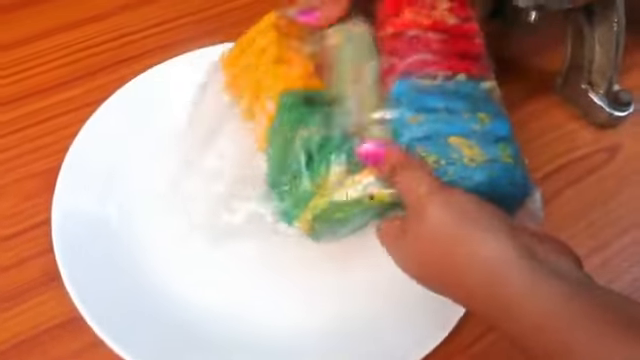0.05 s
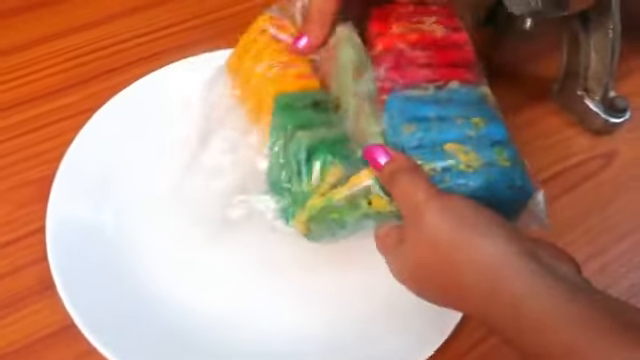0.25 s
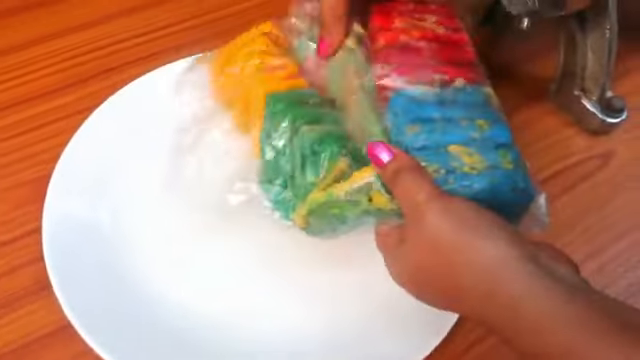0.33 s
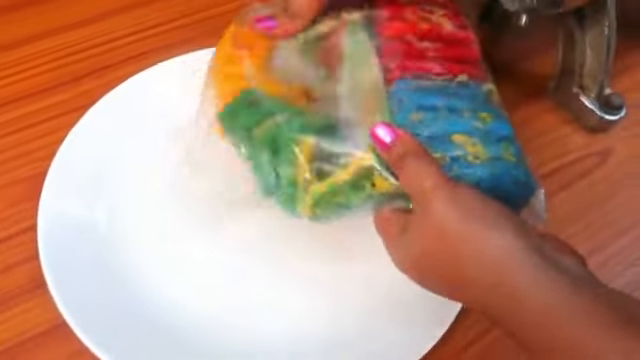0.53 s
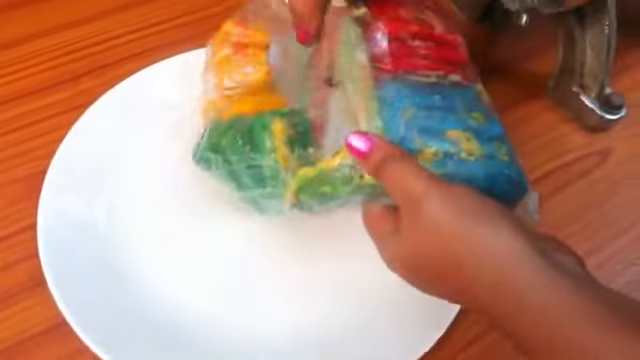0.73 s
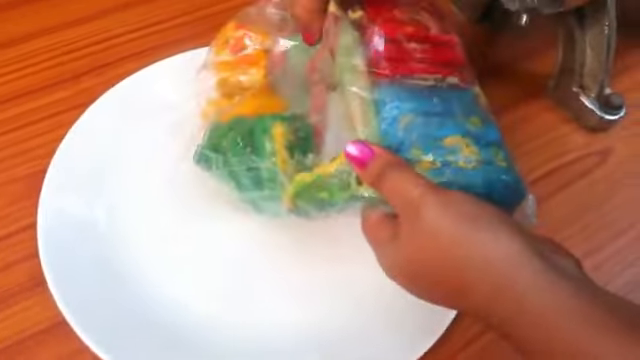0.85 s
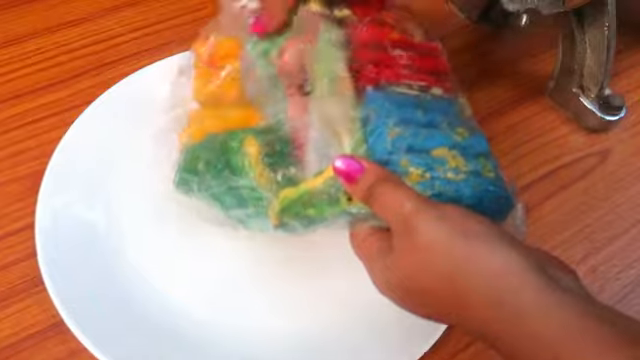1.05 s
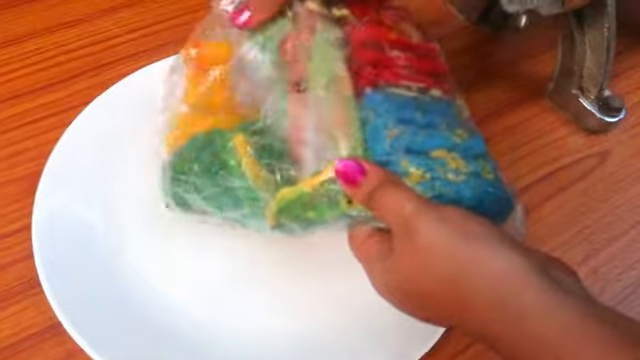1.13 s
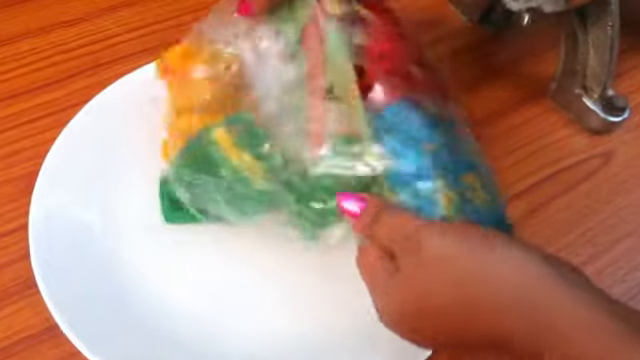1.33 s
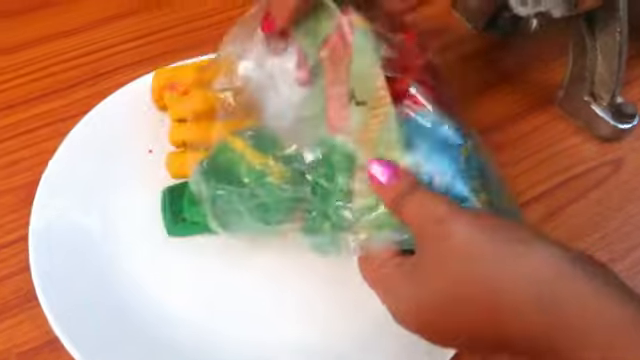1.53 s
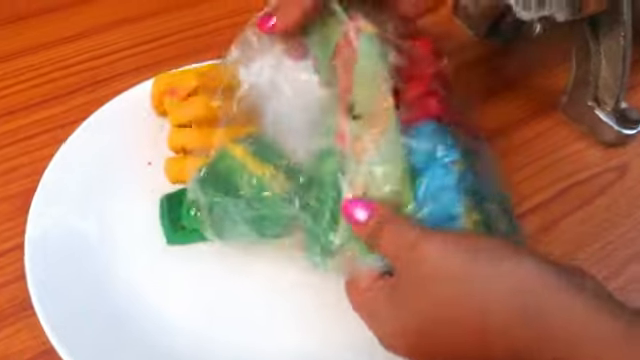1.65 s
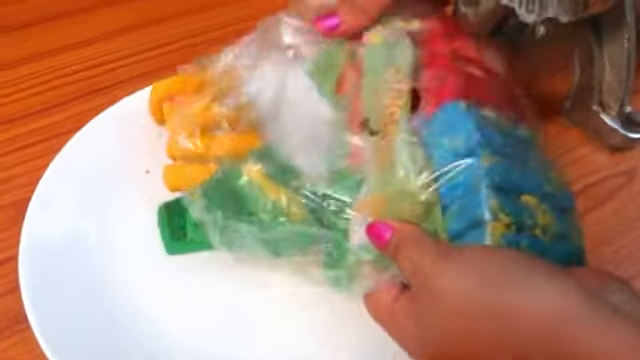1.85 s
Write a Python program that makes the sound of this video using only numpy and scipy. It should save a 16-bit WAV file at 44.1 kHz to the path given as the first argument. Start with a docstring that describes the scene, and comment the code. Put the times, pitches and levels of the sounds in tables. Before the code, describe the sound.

A thin plastic bag crinkles close by throughout, with small sharp snaps, strongest around 0.7 seconds. At 0.8 seconds modelling clay lands on a plate with a hard clack, a very brief ring and a wooden table thump. The bag goes quieter, then rustles up again from 1.4 seconds. More clay falls in a quick cluster of knocks and a thump near 1.6 seconds, in a small quiet room.

```python
"""A thin plastic bag is worked open close by: all along, its film crinkles in tiny buckles and sharper snaps.
Sticks of modelling clay slide out with a faint rumble and a few light taps. At 0.8 s clay lands hard on
a plate, which rings briefly, and the wooden table under it thumps. The bag goes quieter, then rustles up
again, and more clay knocks down near 1.55 s. A small room answers faintly throughout."""
import sys
import numpy as np
from scipy import signal
from scipy.fft import rfft, irfft, next_fast_len
from scipy.io import wavfile
from scipy.ndimage import uniform_filter1d

SR = 44100
rng = np.random.default_rng(int(sys.argv[2]) if len(sys.argv) > 2 else 0)


def waveform_to_disk(signal):
    """Save audio, clipped to [-1, 1], as 16-bit WAV at the path in sys.argv[1]."""
    frames = np.transpose(np.atleast_2d(signal))
    scaled = np.clip(frames, -1, 1) * 32767
    samples = np.round(scaled).astype(np.int16)
    wavfile.write(sys.argv[1], SR, samples)


N = 83790

# how loudly the bag crinkles as the hands work: t/s, then level/dB of the low, mid, upper and high range
CRINKLE_LEVELS = [(0, -41, -37, -42, -46.5), (0.071, -47, -36, -44, -51.5),
                  (0.127, -52.5, -48, -56.5, -57.5), (0.2, -37, -32.5, -42, -47),
                  (0.284, -37, -33.5, -40.5, -53), (0.335, -50, -42, -63, -70),
                  (0.36, -53.5, -44, -60, -65), (0.408, -36, -36.5, -48.5, -54.5),
                  (0.501, -36.5, -31.5, -37.5, -43), (0.56, -41, -36.5, -46.5, -53.5),
                  (0.61, -38.5, -37, -45, -47.5), (0.66, -29.5, -25.5, -33, -41.5),
                  (0.71, -33.5, -31, -44, -48), (0.759, -46.5, -36.5, -47.5, -51),
                  (0.849, -39, -37, -56.5, -56.5), (0.92, -48.5, -45, -58.5, -68),
                  (0.98, -49.5, -50.5, -49.5, -61), (1.05, -60.5, -48, -66, -71),
                  (1.1, -67.5, -56.5, -55.5, -66), (1.16, -54.5, -46, -58, -54.5),
                  (1.21, -57, -52, -67, -70), (1.26, -45.5, -45, -43.5, -58), (1.32, -57.5, -44, -58, -67),
                  (1.37, -54.5, -51.5, -54, -61), (1.42, -45.5, -39.5, -47, -49),
                  (1.48, -45, -36, -43.5, -46.5), (1.56, -39.5, -37.5, -42.5, -54),
                  (1.62, -41, -44, -57, -66), (1.68, -47.5, -44, -61, -73),
                  (1.76, -52.5, -49, -63.5, -67.5), (1.831, -55.5, -51, -61, -66.5),
                  (1.862, -49.5, -43, -54, -48.5), (1.9, -42.5, -38, -45.5, -56)]
# tone of the short crackle in every knock and snap: f/Hz, level/dB
CRACKLE_TONE = [(60, -31), (250, -22.5), (600, 0), (1500, 8), (3500, -15.5), (5000, -3.5), (6500, -55),
                (8300, -29), (11000, -21), (16000, -27)]


def amp(db):
    """Turn decibels into a gain."""
    return 10 ** (np.asarray(db) / 20)


def unit(x):
    """Scale a sound to an average (rms) size of 1."""
    return x / np.sqrt(np.mean(x ** 2) + 1e-20)


def along(points, hz):
    """Read a curve of (f/Hz, value) points at hz, on a log frequency axis."""
    f, values = np.transpose(points)
    return np.interp(np.log(hz + 1), np.log(f + 1), values)


def coloured(x, tone):
    """Filter x to a tone curve (f/Hz, level/dB)."""
    size = 2 * next_fast_len(len(x) // 2 + 2048, real=True)
    gain = amp(along(tone, np.fft.rfftfreq(size, 1 / SR)))
    cepstrum = irfft(np.log(gain), size)
    cepstrum[1:size // 2] *= 2  # folded so that the filter rings only after a click, never before
    cepstrum[size // 2 + 1:] = 0
    return irfft(rfft(x, size) * np.exp(rfft(cepstrum)), size)[:len(x)]


def noise(tone, size):
    """Noise with this tone curve and an rms of 1."""
    return unit(coloured(rng.standard_normal(size), tone))


def fade(t, t60):
    """Die away by 60 dB every t60 seconds."""
    return np.exp(-np.log(1000) * t / t60)


def ping(t, hz, t60):
    """A short pitched click that swells over its first half cycle."""
    swell = 1 - np.exp(-(2 * hz * t) ** 2)
    motion = np.sin(2 * np.pi * hz * t) * fade(t, t60) * swell
    return np.gradient(motion, axis=-1) * SR / (2 * np.pi * hz)  # its slope: no net push of air


def add(track, s, sound):
    """Mix a sound in at s seconds."""
    i = max(round(s * SR), 0)
    track[i:i + len(sound)] += sound[:max(N - i, 0)]


def buckles(spread_db):
    """Start samples and sizes of an uneven run of tiny buckles; gentle handling sets off fewer."""
    tries_per_s, sparse_below_db = 400, -35
    gap_draw, size_draw, flip_draw = rng.random(size=(1500, 3)).T
    s = np.cumsum(0.2 + 1.6 * gap_draw) / tries_per_s
    times, _, mid_db, _, _ = np.transpose(CRINKLE_LEVELS)
    flips = flip_draw < amp(np.interp(s, times, mid_db) - sparse_below_db) ** 0.2
    size = amp(spread_db * np.minimum(-np.log(size_draw), 2.5))
    return (s * SR).astype(int), flips * size


def film(shared, tone, pitch_hz, pitch_spread, own_db, spread_db, t60, slide_share):
    """One range of the plastic: each buckle gives a ping and a burst of hiss, over steady sliding."""
    ring_cycles, rise_s, pings_db = 18.3, 0.00022, -1
    shared_start, shared_size = shared
    own_start, own_size = buckles(spread_db)
    start, size = np.r_[shared_start, own_start], np.r_[shared_size, amp(own_db) * own_size]
    t = np.arange(SR // 60) / SR
    hz = pitch_hz * np.exp(pitch_spread * rng.uniform(-1.075, 1, (len(start), 1)))
    each_ping = size[:, None] * ping(t, hz, ring_cycles / hz)
    positions = start[:, None] + np.arange(len(t))
    pings = np.bincount(positions.ravel(), each_ping.ravel(), N)[:N]
    burst = fade(t, t60) * (1 - np.exp(-t / rise_s))
    energy = np.convolve(np.bincount(start, size ** 2, N)[:N], burst ** 2)[:N]
    hiss = np.sqrt(energy / energy.mean() + slide_share) * rng.standard_normal(N)
    sound = unit(coloured(hiss, tone)) + amp(pings_db) * unit(coloured(pings, tone))
    power = np.abs(uniform_filter1d(sound ** 2, size=1500))
    return sound / np.sqrt(power + 1e-9)  # evens out the loudness


def crinkle():
    """The bag's folds, from broad to tiny, buckle largely together, each range at its own level."""
    # tone of each range of the film: f/Hz, level/dB
    low_tone = [(30, -28), (70, -19), (150, -29.5), (300, -8.5), (600, -2), (900, -5.5), (1200, 2),
                (1600, 0), (2000, 2.5), (3000, -21.5), (8000, -55)]
    mid_tone = [(800, -55), (1650, -37), (2280, 0.5), (2800, -4), (3300, 1.5), (4000, -4.5), (4600, -11.5),
                (6000, -39), (11000, -92)]
    upper_tone = [(2000, -48), (3800, 2), (4700, -1), (5700, 2), (6500, -8.5), (7300, -9.5), (8300, -35),
                  (11000, -76)]
    high_tone = [(3000, -54), (6000, -39), (7200, -12.5), (8300, -14.5), (9300, -5.5), (10500, 1),
                 (13500, 2), (15000, -3), (16000, -58)]
    times, *levels = np.transpose(CRINKLE_LEVELS)
    low, mid, upper, high = [amp(np.interp(np.arange(N) / SR, times, db)) for db in levels]
    shared = buckles(spread_db=5)
    low *= film(shared, low_tone, pitch_hz=1154, pitch_spread=0.529,
                own_db=10, spread_db=3, t60=0.011, slide_share=0.17)
    mid *= film(shared, mid_tone, pitch_hz=2960, pitch_spread=0.5,
                own_db=-9, spread_db=6.5, t60=0.012, slide_share=0.15)
    upper *= film(shared, upper_tone, pitch_hz=5360, pitch_spread=0.27,
                  own_db=-9.5, spread_db=7.5, t60=0.008, slide_share=0.11)
    high *= film(shared, high_tone, pitch_hz=11100, pitch_spread=0.45,
                 own_db=-6.5, spread_db=7, t60=0.006, slide_share=0.052)
    return amp(-0.5) * low + amp(-1.5) * mid + amp(-1) * upper + amp(-1.5) * high


def clay_slide():
    """The sliding sticks rub a faint rumble out of plate and table."""
    # loudness of the rumble: t/s, level/dB
    rumble_levels = [(0, -63), (.4, -68), (.55, -60), (.67, -45.5), (.77, -55), (.88, -56), (.95, -75),
                     (1.2, -71), (1.33, -62.5), (1.5, -58.5), (1.64, -47), (1.72, -63.5), (1.9, -62.5)]
    # its tone: f/Hz, level/dB
    rumble_tone = [(30, -14), (70, -20), (120, -4.5), (165, -4), (210, -3.5), (300, 2), (400, -5.5),
                   (700, -20), (2000, -86.5)]
    times, db = np.transpose(rumble_levels)
    return amp(np.interp(np.arange(N) / SR, times, db)) * noise(rumble_tone, N)


def room_air():
    """The steady, very soft hush of the room."""
    # tone of the hush: f/Hz, level/dB
    hush_tone = [(25, -13.5), (55, 0), (150, -7), (500, 8), (2000, -7), (8000, -86), (16000, -43)]
    return amp(-65) * noise(hush_tone, N)


def room_echo(x):
    """The small room adds a short tail in which the middle pitches die first."""
    # how long the room rings: f/Hz, t60/s
    ring_times = [(200, 0.2), (1500, 0.053), (5000, 0.053), (14000, 0.19)]
    hz, t, spectra = signal.stft(rng.standard_normal(SR // 3), SR, nperseg=256)
    tail = signal.istft(spectra * fade(t, along(ring_times, hz)[:, None]), SR, nperseg=256)[1]
    delayed = np.pad(tail, (SR // 250, 0)) / np.linalg.norm(tail)
    return signal.fftconvolve(x, delayed)[:N]


def clay_knocks():
    """Clay hits the plate with a dull clack; the plate's notes near that pitch ring on the loudest."""
    # taps and landings: t/s, level/dB, clack f/Hz, clack t60/s, plate ring/dB, dull above f/Hz
    hits = [(0.037, -29.5, 1210, .02, -16, 1600), (.079, -27.5, 775, 0.017, -16, 1390),
            (.747, -27.5, 595, 0.02, -19, 900), (.782, -21, 1240, 0.002, -7, 2360),
            (.7994, 5, 1334, 0.0044, -20.5, 4140), (0.803, -2, 1520, 0.008, -31, 3350),
            (.827, -19, 2800, 0.0051, -26, 3400), (.8375, -16, 1750, 0.0058, -14, 3420),
            (1.3836, -18, 1970, .004, -13, 3000), (1.538, -5.5, 1090, .014, -27, 2000),
            (1.5419, -5.5, 1950, 0.006, -14, 2180), (1.558, -19, 1110, 0.02, -25, 1400),
            (1.572, -27, 1130, .015, -22, 3200), (1.5879, -7.5, 3067, 0.021, -20, 3550),
            (1.5886, -14, 1140, .014, -10.5, 2400), (1.5911, -2, 2410, 0.0041, -23, 3700),
            (1.609, -26, 3000, 0.011, -4, 3450)]
    # the plate's own notes: f/Hz, level/dB, t60/s
    plate_notes = [(586, 1.5, 0.049), (733, -7.5, .13), (865, -15, 0.057), (1201, 8, 0.024),
                   (1541, 2.5, 0.047), (1822, -12, 0.076), (2026, 2, 0.02), (2260, 2, 0.035),
                   (2500, -7, 0.11), (3140, -4, 0.036), (3310, -2, 0.04)]
    # tone of the bright, clipping-like click on the loudest hits: f/Hz, level/dB
    click_tone = [(1000, -10), (3000, 3), (4500, 2), (6700, -19), (9000, -27), (15000, -36)]
    out, t = np.zeros(N), np.arange(SR // 4) / SR
    for s, db, hz, t60, ring_db, dull_hz in hits:
        ring = sum(amp(level + rng.normal(0, 0.98)) / (1 + 1.7 * np.log2(f / hz) ** 2) * ping(t, f, life)
                   for f, level, life in plate_notes)
        crackle = amp(-15.5) * noise(CRACKLE_TONE, len(t)) * fade(t, t60=0.018)
        click = amp(db - 18.5) * noise(click_tone, len(t)) * fade(t, t60=0.0047)
        softness = [(dull_hz, 0), (2 * dull_hz, -37.5)]  # soft clay muffles the treble
        clack = coloured(ping(t, hz, t60) + crackle + amp(ring_db) * ring, softness)
        # db counts twice in the click, so the loudest hits crack as if overloaded
        add(out, s, amp(db) * (clack + click))
    return out


def bag_snaps():
    """A fold flips: a few cycles of its own pitch, a bright tick and a shiver of the film around it."""
    # single folds snapping over: t/s, level/dB, f/Hz, treble/dB
    folds = [(0.0372, -25, 2700, 0), (0.0634, -16.5, 3360, -5), (0.08, -22.5, 2510, -20),
             (0.103, -19, 3040, -7.5), (0.1186, -23, 3350, -24), (0.1361, -23, 3370, -9),
             (0.1583, -19, 3030, -4), (0.1993, -9.5, 1590, -18), (0.2167, -16, 2000, -7.5),
             (0.2258, -15.5, 1240, -16), (0.2639, -15, 2100, -15), (0.3477, -20, 2320, -20),
             (0.3751, -11, 3200, -37), (0.3913, -17, 2130, -11), (0.4035, -9.5, 2470, -26),
             (0.414, -11, 3260, -20), (0.475, -13, 2640, -11.5), (0.5011, -7.5, 3380, -21),
             (0.5284, -27, 2450, 1), (0.5493, -10.5, 3160, -6.5), (0.5805, -12, 1640, -15.5),
             (0.6135, -15.5, 2400, -28), (0.644, -13, 3120, -5), (0.6552, -14, 3270, -28),
             (0.6641, -12, 2920, -6), (0.677, -10, 3430, -22), (0.8813, -18.5, 2480, -16),
             (1.0344, -21.5, 3780, -12), (1.113, -32, 3480, -11), (1.1561, -26, 3300, -17),
             (1.1753, -28, 3850, -13), (1.2546, -29.5, 3870, -9), (1.271, -27, 5100, 1.5),
             (1.3102, -27.5, 2660, -17), (1.3366, -25.5, 2400, -13), (1.3944, -18, 2460, -13),
             (1.4085, -18, 2450, -27), (1.4674, -31, 3080, 11), (1.5281, -17, 4300, -11),
             (1.5525, -19.5, 3670, -4), (1.5785, -21.5, 4900, -26), (1.6462, -29.5, 3170, -10.5),
             (1.7104, -26, 2520, -33), (1.8546, -18, 2750, -10), (1.8688, -18, 3240, -13)]
    # tone of the tick: f/Hz, level/dB
    tick_tone = [(2000, -14.5), (5000, 8), (7000, -1), (8300, -16.5), (10500, -2), (13500, 0.5),
                 (16000, -22)]
    out, t = np.zeros(N), np.arange(SR // 25) / SR
    onset = 1 - np.exp(-t / 0.00016)
    for s, db, hz, treble_db in folds:
        shiver = amp(-19.5) * noise(CRACKLE_TONE, len(t)) * fade(t, t60=0.018)
        tick = amp(treble_db - 5.5) * noise(tick_tone, len(t)) * fade(t, t60=0.011)
        add(out, s, amp(db + 0.5) * onset * (ping(t, hz, t60=0.006) + shiver + tick))
    return out


def table_thumps():
    """The table top booms under each landing; its notes start opposed, so the boom swells and wavers."""
    # weight settling on the table: t/s, level/dB, rise/s, factor on the ring time
    landings = [(.567, -40, .002, 1), (.584, -30, .0024, 1), (.686, -33.5, .013, 0.75),
                (0.8004, -9.5, 0.0077, 0.7), (1.347, -39, 0.0042, 0.83), (1.368, -37, 0.0051, 1),
                (1.522, -36.5, 0.0031, 1.1), (1.539, -30.5, 0.0045, 1), (1.568, -28, 0.0034, 1.1),
                (1.5878, -12.5, 0.0076, 1.13), (1.607, -30, 0.0041, 1.2), (1.644, -34, .0044, 1.08)]
    # the table's own notes: f/Hz, level/dB, t60/s
    table_notes = [(164.8, -30, 0.16), (242, -27, 0.067), (286, -11.5, 0.13), (340.2, 0, 0.096),
                   (477, -7.5, 0.036)]
    out, t = np.zeros(N), np.arange(SR // 3) / SR
    for s, db, rise_s, ring_factor in landings:
        boom = np.zeros(len(t))
        for k, (hz, level, t60) in enumerate(table_notes):
            gain = (-1) ** k * amp(level + rng.normal(0, 1.2))
            detune = 1 + rng.normal(0, 0.0034)
            boom += gain * ping(t, hz * detune, ring_factor * t60)
        add(out, s, amp(db) * (1 - np.exp(-t / rise_s)) * boom)
    return out


def scene():
    """Bag, plate and table in a quiet room; such small things give off little deep bass."""
    near = crinkle() + clay_slide() + bag_snaps() + clay_knocks() + table_thumps()
    bass_cut = signal.butter(2, 67, "highpass", fs=SR, output="sos")
    near = signal.sosfilt(bass_cut, near)
    return (near + amp(-10) * room_echo(near) + room_air())[None]


def record(dry):
    """Clip any peak beyond full scale, then remove the very highest treble."""
    size, top_hz = next_fast_len(N + SR // 4), 15900
    spectrum = rfft(np.clip(dry, -1, 1), size)
    return irfft(spectrum * (np.fft.rfftfreq(size, 1 / SR) < top_hz), size)[:, :N]


dry = scene()
out = record(dry)
waveform_to_disk(out)
```